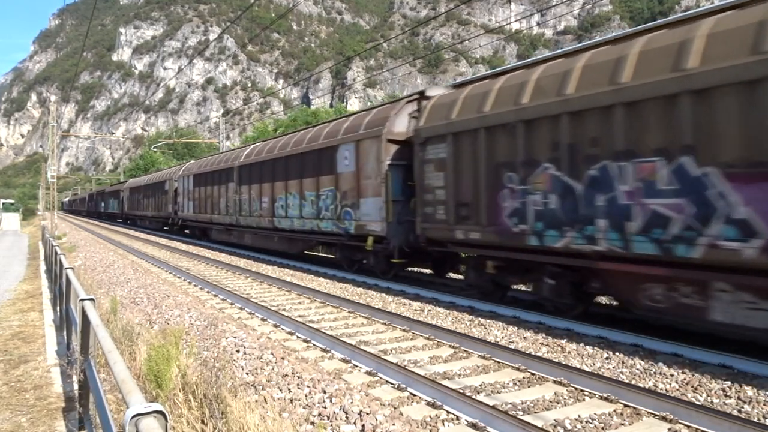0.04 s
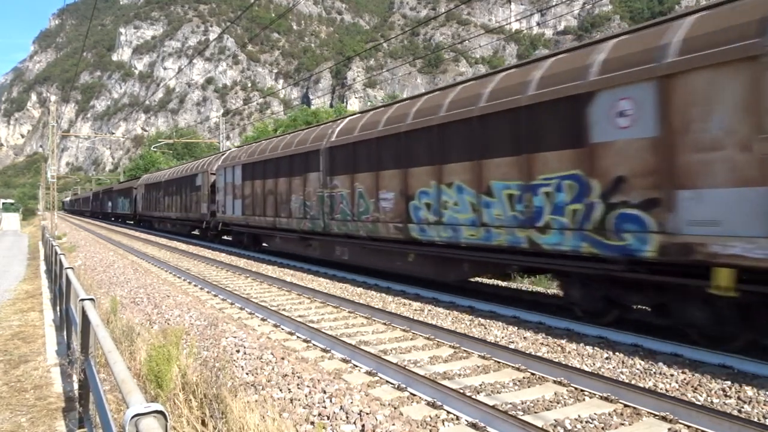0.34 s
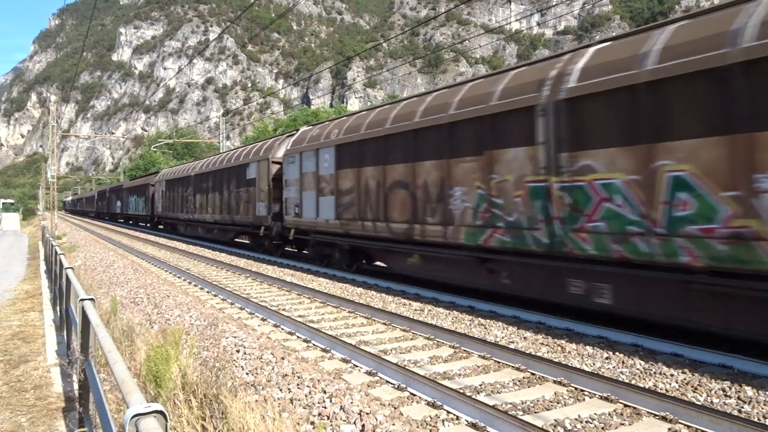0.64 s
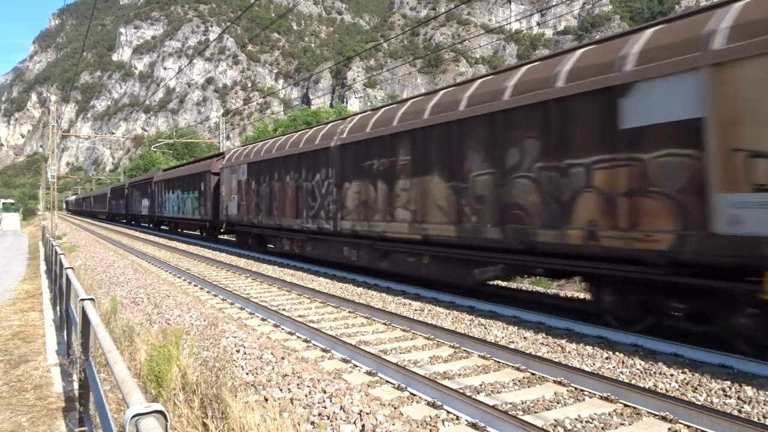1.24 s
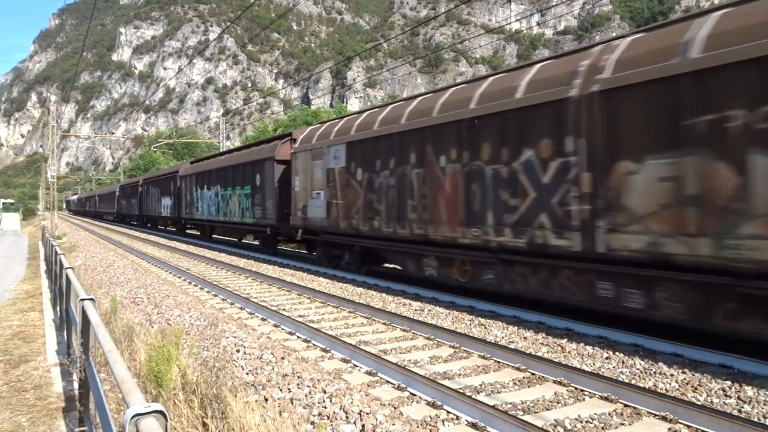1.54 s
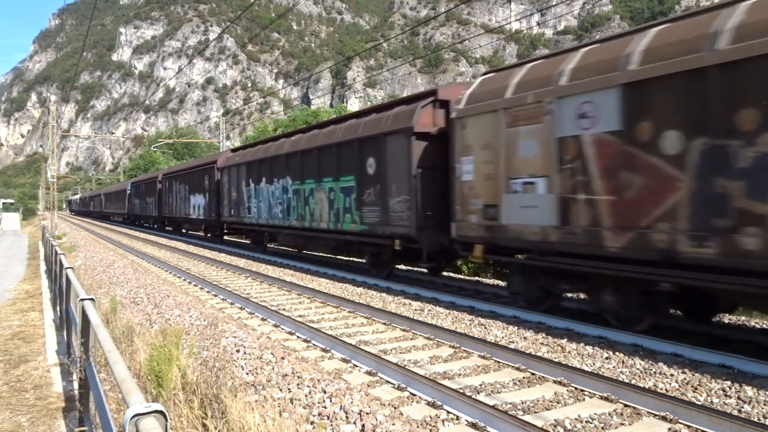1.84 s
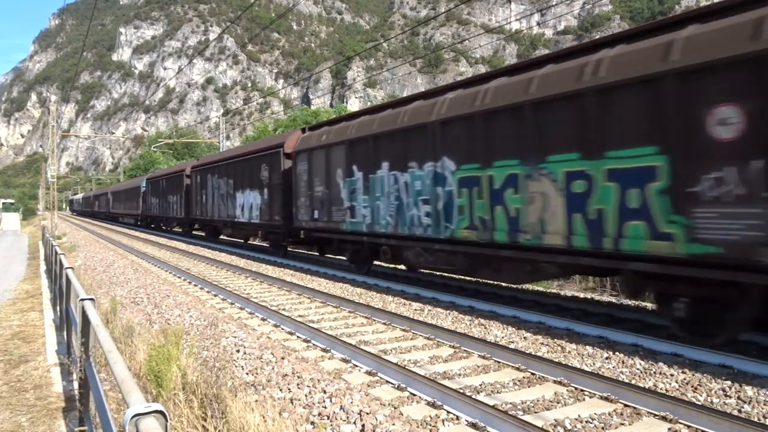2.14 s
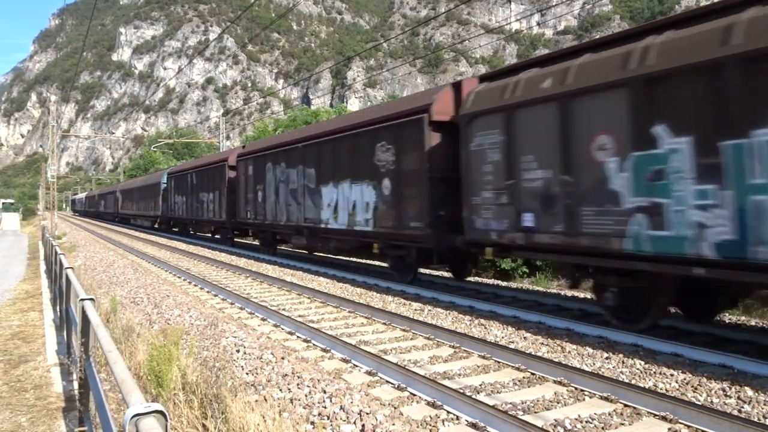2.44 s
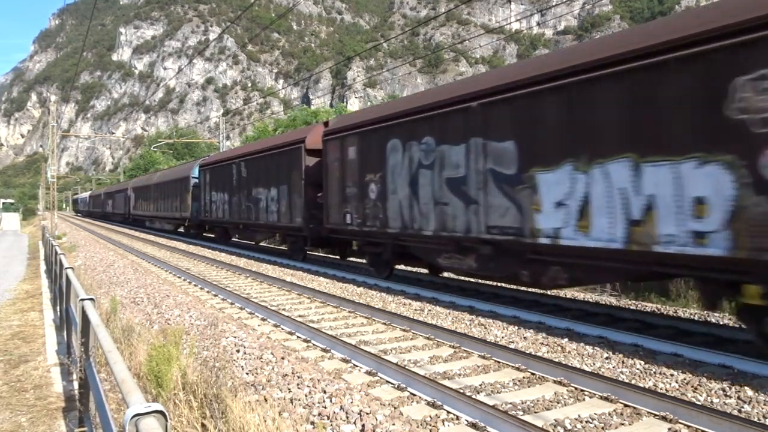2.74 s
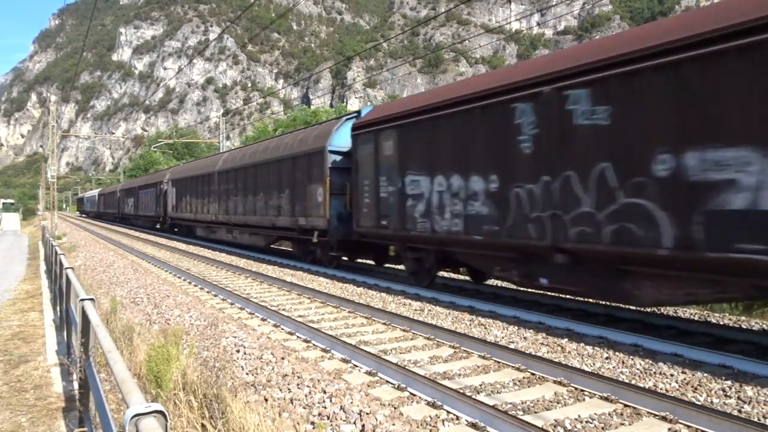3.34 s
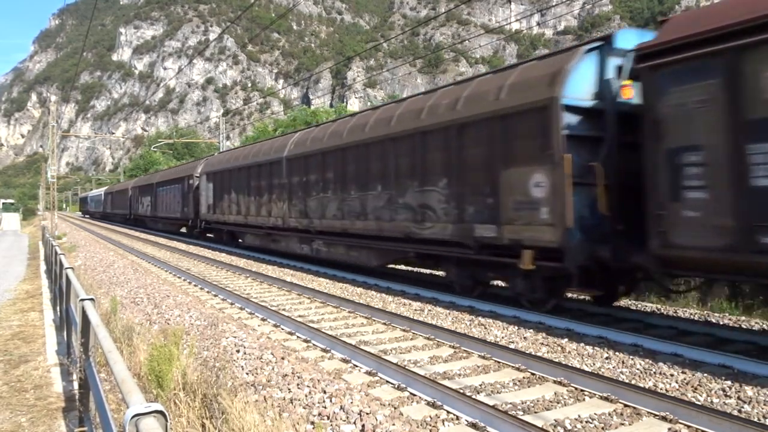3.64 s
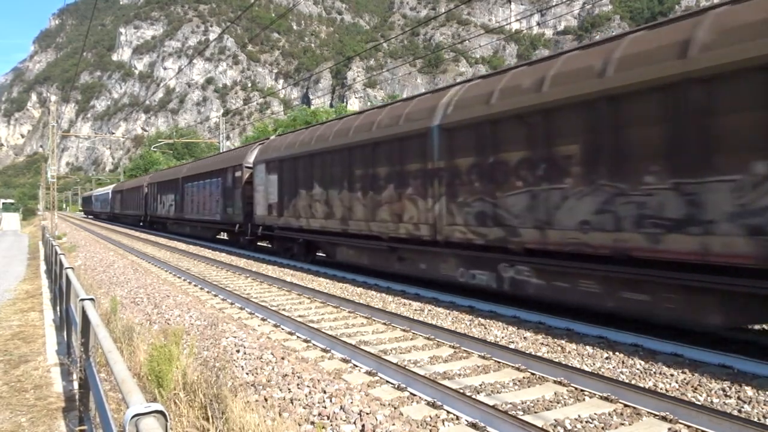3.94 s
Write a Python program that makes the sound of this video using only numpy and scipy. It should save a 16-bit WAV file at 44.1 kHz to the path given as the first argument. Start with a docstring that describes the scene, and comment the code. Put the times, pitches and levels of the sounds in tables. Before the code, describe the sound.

A freight train rolls past close by, its loud roar and ringing rails lasting all four seconds, slightly to the right. Short high wheel squeaks and scrapes cluster in the first 0.7 seconds and return between 2 and 3.5 seconds. Metal knocks come from under the wagons, the clearest near 0.8 seconds, others around 1.7 and 2.1. The low rumble swells early and eases toward the end.

```python
"""A long freight train rolls past at speed, a few metres from a close pair of microphones.
Rough wheels make the rails, wheels and wagons roar and ring; bogies sweep by one after another.
Now and then a flange scrapes or squeaks on the rail and the running gear knocks.
Underneath, an out-of-round wheel thumps once a turn."""
import sys
import numpy as np
from scipy import signal
from scipy.fft import rfft, irfft
from scipy.io import wavfile
from scipy.ndimage import uniform_filter1d

SR = 44100
rng = np.random.default_rng(int(sys.argv[2]) if len(sys.argv) > 2 else 0)


def digitize_waveform(pressure):
    """Quantize a signal to 16-bit integers and store it at the path in sys.argv[1].

    Rows of a 2-D input are taken as channels; values are limited to [-1, 1].
    """
    field = np.atleast_2d(pressure).T
    bounded = np.clip(field, -1, 1)
    quanta = np.round(bounded * 32767).astype(np.int16)
    wavfile.write(sys.argv[1], SR, quanta)


N = 176400
TIME_S = np.arange(N) / SR
FRAME, HOP = 1024, 256
HZ = np.fft.rfftfreq(FRAME, 1 / SR)
FRAME_S = np.arange(N // HOP + 5) * HOP / SR


def amp(db):
    """Decibels to gain."""
    return 10 ** (np.asarray(db) / 20)


def unit(x):
    """Scales to an rms of one."""
    return x / np.sqrt(np.mean(abs(x) ** 2) + 1e-20)


def at_hz(points, hz):
    """Reads a spectrum on a log-frequency axis."""
    f, value = np.transpose(points)
    return np.interp(np.log(hz + 1), np.log(f + 1), value)


def at_s(points, s, column=1):
    """Reads one column of a curve in time."""
    rows = np.array(points)
    return np.interp(s, rows[:, 0], rows[:, column])


def add(mix, s, sound):
    """Adds a sound into the mix at a time."""
    part = mix[max(round(s * SR), 0):][:len(sound)]
    part += sound[:len(part)]


def coloured(points):
    """Steady noise with a given spectrum."""
    gain = amp(at_hz(points, np.fft.rfftfreq(N, 1 / SR)))
    return unit(irfft(rfft(rng.standard_normal(N)) * gain, N))


def wander(width_hz, size=N):
    """The wandering complex amplitude of a noise-driven resonance."""
    real, imag = rng.standard_normal((2, size))
    rolloff = 1 + (np.fft.fftfreq(size, 1 / SR) / (0.68 * width_hz)) ** 2
    return unit(np.fft.ifft((real + 1j * imag) / rolloff))


def drift(shape, frames):
    """Random values smoothed over a few frames."""
    return unit(uniform_filter1d(rng.standard_normal(shape), frames, axis=0))


def white_spectra():
    """Short-time spectra of white noise."""
    real, imag = rng.standard_normal((2, len(FRAME_S), len(HZ)))
    return real + 1j * imag


def resonance(half_s, hz, width_hz, sag_per_s):
    """A noise-driven resonance that swells, fades and sinks in pitch."""
    t = np.arange(-half_s, half_s, 1 / SR)
    carrier = np.exp(2j * np.pi * hz * np.cumsum(1 - sag_per_s * t) / SR)
    swell = np.cos(np.pi * t / (2 * half_s)) ** 2
    return swell * unit((wander(width_hz, size=SR * 2)[:len(t)] * carrier).real)


# The loudest bogie, heard from the trackside. Each row: time in seconds, lag of the left
# microphone in ms, how far the bogie stands out from 0 to about 1.
BOGIE_BEARING = [(0, 0.09, 0.74), (0.2, 0.052, 1.01), (0.7, 0.084, 1), (0.9, 0.044, 0.8), (1.1, 0.036, 1),
                 (1.3, 0.062, 1.0), (1.6, 0.091, 0.94), (1.87, 0.049, 0.85), (2.05, 0.048, 0.86),
                 (2.2, 0.078, 0.8), (2.7, 0.073, 1), (3.3, 0.07, 0.85), (4, 0.072, 1.02)]
# The pair with one bogie standing out. Each row: frequency in Hz, left-right likeness from 0 to 1.
PAIR_LIKENESS = [(30, 0.71), (250, 1), (950, 0.92), (1700, 0.75), (2800, 0.9), (4300, 0.68), (7000, 0.57),
                 (11000, 0.19)]
# The train is to the right of the pair. Each row: frequency in Hz, left minus right in dB.
PAIR_BALANCE = [(60, 7), (110, 0.5), (190, -0.5), (350, -0.5), (620, -1.5), (1120, -5.5), (2020, -7),
                (3620, -2), (6500, -0.5), (11700, 2)]
SWING_DB_PER_S = -0.2  # the roar moves slowly to the right


def microphones(direct, diffuse):
    """Sound reaches the left microphone later than the right, partly scattered and mostly weaker."""
    lag_s = at_s(BOGIE_BEARING, FRAME_S)[:, None] / 1000
    focus = np.clip(at_s(BOGIE_BEARING, FRAME_S, column=2), .05, 1.2)[:, None]
    likeness = np.clip(at_hz(PAIR_LIKENESS, HZ) * focus ** np.minimum(HZ / 6000, 1.5), 0, .995)
    left = (likeness * direct + np.sqrt(1 - likeness ** 2) * diffuse) * np.exp(-2j * np.pi * HZ * lag_s)
    midrange = np.clip(HZ / 1000, 0, 1) * np.clip(2 - HZ / 3000, 0, 1)
    swing_db = SWING_DB_PER_S * (FRAME_S - FRAME_S.mean())[:, None] * midrange
    balance = amp(at_hz(PAIR_BALANCE, HZ) + swing_db)
    pair = np.array([left * balance, direct]) * np.sqrt(2 / (1 + balance ** 2))
    return signal.istft(pair.transpose(0, 2, 1), nperseg=FRAME, noverlap=FRAME - HOP)[1][:, :N]


def from_track(sound):
    """Carries a sound from the track to the pair, with a ground echo of random phase per band."""
    padded = np.pad(sound, (0, len(FRAME_S) * HOP - N))
    direct = signal.stft(padded, nperseg=FRAME, noverlap=FRAME - HOP)[2].T[:len(FRAME_S)]
    ground_echo = direct * np.exp(1j * np.cumsum(rng.uniform(0, 2, len(HZ))))
    return microphones(direct, ground_echo)


# A dull thump, far under the roar. Each row: frequency in Hz, relative level in dB.
THUMP_COLOUR = [(30, -40), (80, -3), (125, -2), (220, -6.5), (400, -4.5), (900, -14)]
TURN_HZ, THUMP_AT_S, THUMP_DECAY_S, THUMP_DB = 9.2, 0.0607, 0.013, -44


def wheel_thumps():
    """An out-of-round wheel loads the rail once in every turn."""
    since_s = (TIME_S - THUMP_AT_S) % (1 / TURN_HZ)
    pulses = np.minimum(since_s / 0.0024, 1) * np.exp(-since_s / THUMP_DECAY_S)
    return amp(THUMP_DB) * unit(pulses * coloured(THUMP_COLOUR))


# Wagons passing the microphones. Each row: middle and half-length in seconds, pitch in Hz, level in dB.
WAGON_BOOMS = [(0.559, .16, 609, -27), (1.1, .4, 429.7, -30), (1.283, .2, 561.4, -29.5),
               (1.72, .3, 450.8, -27.5), (2.12, 0.15, 229.6, -39)]
DOPPLER_PER_S = .05  # fraction of its pitch a passing source loses each second


def wagon_booms():
    """The hollow wagon bodies resonate, each at its own pitch."""
    out = np.zeros(N)
    for middle, half_s, hz, db in WAGON_BOOMS:
        add(out, middle - half_s, amp(db) * resonance(half_s, hz, width_hz=92, sag_per_s=DOPPLER_PER_S))
    return out


# Single wheels, a few metres off. Each row: middle and half-length in seconds, pitch in Hz, level in dB.
WHEEL_MODES = [(.68, 0.12, 2750, -30), (1.27, 0.17, 2770, -29.5), (1.268, .25, 3560, -33),
               (1.98, 0.082, 3960, -32), (2.0, 0.26, 2895, -30), (2.12, .15, 2600, -28),
               (2.55, .3, 2430, -26.5), (2.58, .1, 3600, -33), (2.86, .11, 3760, -29),
               (3.007, .06, 4030, -29), (3.491, 0.043, 2360, -24), (3.719, 0.23, 2390, -27.5),
               (3.76, .12, 4620, -37), (3.97, .1, 3350, -30)]


def wheel_rings():
    """Each passing wheel rings at a mode of its own, lowered by its motion."""
    out = np.zeros(N)
    for middle, half_s, hz, db in WHEEL_MODES:
        add(out, middle - half_s, amp(db) * resonance(half_s, hz, width_hz=27, sag_per_s=DOPPLER_PER_S))
    return out


# Scrapes down at the rail. Each row: start in seconds, fade time in seconds, level in dB.
FLANGE_SCRAPES = [(.0, .09, -29), (.14, 0.055, -30), (0.373, .12, -28), (0.64, 0.13, -28),
                  (1.172, .02, -35), (2.06, .03, -22.5), (2.295, .05, -29), (2.41, .05, -29),
                  (2.76, 0.027, -23.5), (2.82, .04, -42), (3.41, 0.05, -36), (3.54, .05, -27.5)]
# Steel rubbing steel. Each row: frequency in Hz, relative level in dB.
RUB_COLOUR = [(500, -30), (3000, -4), (5500, -7), (8000, -10), (11000, -17)]


def flange_scrapes(rise_s=0.0091, rattle_hz=45, rattle_db=3):
    """A flange rubs the rail: a brief, rattling burst of bright noise."""
    bursts = np.zeros(N)
    for start, fade_s, db in FLANGE_SCRAPES:
        t = np.arange(0, 2 * fade_s, 1 / SR)
        add(bursts, start, amp(db) * np.minimum(t / rise_s, 1) * np.exp(-(t / fade_s) ** 2))
    rattle = amp(rattle_db * unit(wander(rattle_hz).real))
    return bursts * rattle * coloured(RUB_COLOUR)


# Squeaks down at the rail. Each row: middle and half-length in seconds, pitch in Hz, level in dB,
# octave against the tone in dB.
FLANGE_SQUEAKS = [(.24, .03, 6050, -31, -14), (0.405, 0.033, 5670, -27, -12),
                  (0.437, 0.035, 5300, -27, -15), (0.503, .08, 5700, -30, -12),
                  (0.592, .04, 5780, -28.5, -14), (.675, 0.062, 5250, -24.5, -10.5),
                  (2.561, 0.069, 5180, -30, -8.5), (2.665, 0.029, 5040, -26, -14),
                  (2.681, 0.077, 5560, -34, 2), (2.886, 0.04, 5310, -28.5, -1),
                  (3.157, 0.055, 5260, -35, -6)]


def flange_squeaks(width_hz=120, sag_per_s=0.313):
    """A flange sticks and slips: a short rough whistle with its octave."""
    out = np.zeros(N)
    for middle, half_s, hz, db, octave_db in FLANGE_SQUEAKS:
        tone = resonance(half_s, hz, width_hz, sag_per_s)
        octave = resonance(half_s, 2 * hz, 2 * width_hz, sag_per_s)
        add(out, middle - half_s, amp(db) * (tone + amp(octave_db) * octave))
    return out


# Knocks from under the wagons. Each row: start in seconds, pitch in Hz, peak level in dB.
GEAR_KNOCKS = [(.774, 990, -11), (1.31, 1284, -18), (1.727, 1030, -15.5), (2.075, 825, -17),
               (2.305, 2250, -16), (3.42, 392, -19)]


def gear_knocks(rise_s=.006):
    """Jolts in the running gear ring briefly through the roar."""
    out, t = np.zeros(N), TIME_S[:SR // 10]
    jolt = t / rise_s * np.exp(1 - t / rise_s)
    for start, hz, db in GEAR_KNOCKS:
        add(out, start, amp(db) * jolt * np.sin(2 * np.pi * hz * t))
    return out


# The rails beside the microphones. Each row: pitch and width in Hz, first and last level in dB.
RAIL_MODES = [(365, 71, -39.5, -35.5), (969.5, 83, -29.5, -23.5), (1298, 96, -31, -30.5),
              (1370, 37, -33, -25.5)]


def rail_rings():
    """Rolling keeps the resonances of the rails ringing."""
    out = np.zeros(N)
    for hz, width_hz, first_db, last_db in RAIL_MODES:
        ring = unit((wander(width_hz) * np.exp(2j * np.pi * hz * TIME_S)).real)
        out += amp(np.interp(TIME_S, [0, N / SR], [first_db, last_db])) * ring
    return out


# The roar from a few metres away. Each row: frequency in Hz, relative level in dB.
ROLL_COLOUR = [(20, -45), (60, -57.5), (115, -24.5), (150, -31.5), (190, -15.5), (290, -16), (350, -10),
               (550, -8.5), (750, -2.5), (1100, -1.5), (1400, -2.7), (1550, -5), (2700, -6.5), (3200, -11),
               (4300, -16), (5500, -18.5), (7500, -24.5), (11000, -31)]
# The later wagons roll with another colour. Each row: frequency in Hz, change in dB.
LATER_WAGONS = [(100, 1), (220, 2.5), (360, 1.5), (470, -0.5), (620, 0.5), (900, 2), (1120, 2), (1500, 1.5),
                (2050, -0.5), (2400, 1), (2700, -2.5), (3300, -1.5), (3800, -1), (4300, -1.5), (5500, -0.5),
                (8000, -2.5), (11000, -1)]
# Five bands, low to high, swell as the train goes by. Each row: time in seconds, relative level in dB.
RUMBLE_SWELL = [(0, 7), (0.2, 3), (0.55, 10), (0.95, 1), (1.25, 3), (1.55, 7), (1.8, -6), (2.1, 4),
                (2.7, -3.0), (3.3, -5), (4, -6)]
DRONE_SWELL = [(0, -1.5), (0.2, -2.5), (0.55, 3), (0.85, 0.1), (1.4, 2), (1.85, 0.8), (2.2, 2.5), (2.6, 0),
               (3.1, -0.5), (3.4, 2), (3.65, 1), (4, 0)]
ROAR_SWELL = [(0, -6.5), (0.2, -4), (0.45, -1.8), (0.8, -1.5), (1.5, -0.9), (2.1, -3.7), (3, -3.8),
              (4, -3.8)]
WHEEL_SWELL = [(0, 1.4), (0.2, -0.2), (0.55, 1.5), (0.85, 0.5), (1.15, 0.9), (1.5, 1), (1.9, 2), (2.4, 2),
               (2.8, 2), (3.1, 0.3), (3.45, 0.8), (3.75, 2.4), (4, 1)]
HISS_SWELL = [(0.0, -26), (0.05, -31.5), (0.41, -31.5), (0.58, -32), (0.7, -33.5), (0.73, -33.5),
              (1.05, -32), (1.44, -32.5), (2.12, -32.5), (2.18, -34), (2.61, -32.5), (3.44, -34.5),
              (3.78, -33), (4.0, -34)]
# Where those bands meet. Each row: middle in Hz, width in Hz.
BAND_EDGES = [(165, 70), (650, 390), (1550, 870), (3900, 2000)]
ROLL_DB, LATER_MIDDLE_S, LATER_BLEND_S = -15.5, 2.17, 0.57


def rolling_roar(patch_db=1.07, flutter_db=0.56, treble_flutter_db=1):
    """Rough wheels roar on rough rails: five bands swell, with drifting patches and a slight flutter."""
    frames = len(FRAME_S)
    later = np.clip((FRAME_S - LATER_MIDDLE_S) / LATER_BLEND_S, -.5, .5)[:, None]
    db = at_hz(ROLL_COLOUR, HZ) + later * at_hz(LATER_WAGONS, HZ)
    highpasses = [np.clip((HZ - hz) / width + .5, 0, 1) for hz, width in BAND_EDGES]
    swells = RUMBLE_SWELL, DRONE_SWELL, ROAR_SWELL, WHEEL_SWELL, HISS_SWELL
    for swell, lower, upper in zip(swells, [1] + highpasses, highpasses + [0]):
        level = at_s(swell, FRAME_S)
        db += (level - level.mean())[:, None] * (lower - upper)
    db += patch_db * unit(uniform_filter1d(drift((frames, len(HZ)), frames=14), size=3, axis=1))
    db += flutter_db * drift((frames, 1), frames=4)
    db += treble_flutter_db * drift((frames, 1), frames=3) * highpasses[-1]
    direct, diffuse = white_spectra() * amp(db), white_spectra() * amp(db)
    return amp(ROLL_DB) * unit(microphones(direct, diffuse))


def scene():
    """The whole train at the two trackside microphones."""
    roar = rolling_roar()
    ringing = rail_rings() + wagon_booms() + wheel_rings()
    contacts = flange_squeaks() + flange_scrapes() + gear_knocks() + wheel_thumps()
    return roar + from_track(ringing + contacts)


def record(dry):
    """The recorder rounds off the highest peaks and limits the band."""
    knee, ceiling, cutoff_hz = .7, .92, 11110
    over = np.maximum(abs(dry) - knee, 0)
    headroom = ceiling - knee
    rounded = np.clip(dry, -knee, knee) + np.sign(dry) * headroom * np.tanh(over / headroom)
    lowpass = signal.firwin(1023, cutoff_hz, window=("kaiser", 9), fs=SR)
    return signal.oaconvolve(rounded, lowpass[None], "same", axes=1)


dry = scene()
out = record(dry)
digitize_waveform(out)
```